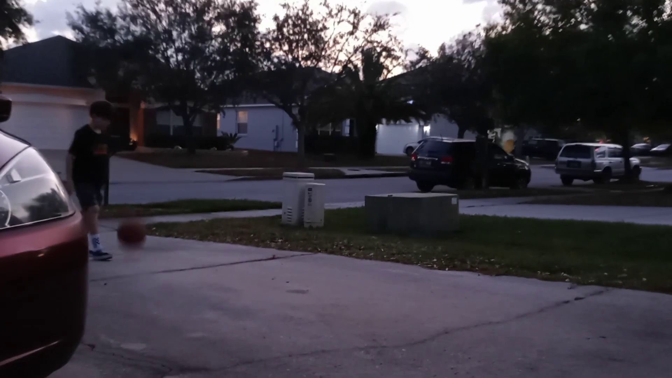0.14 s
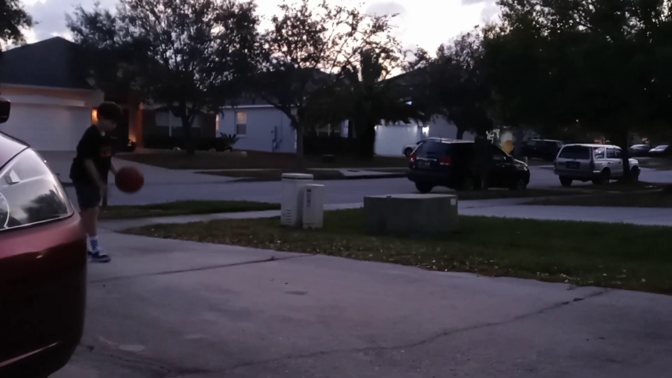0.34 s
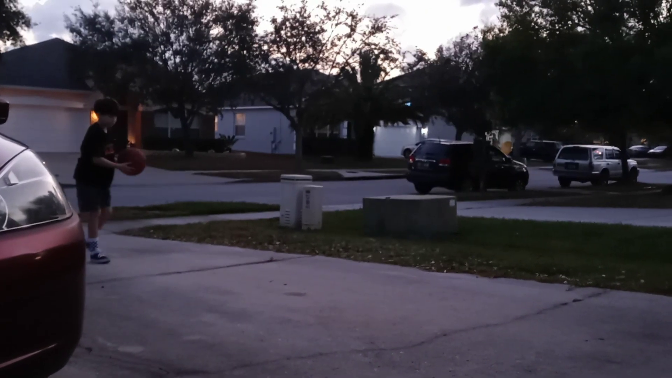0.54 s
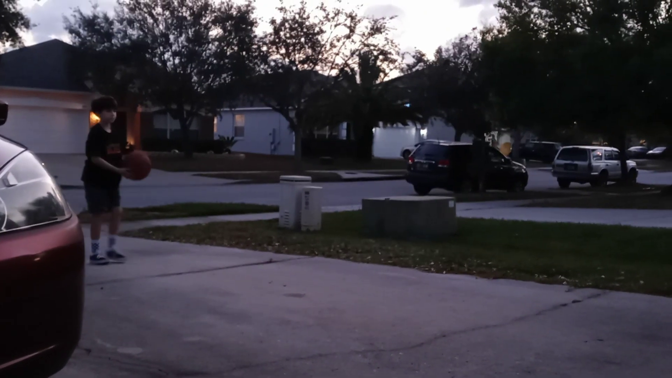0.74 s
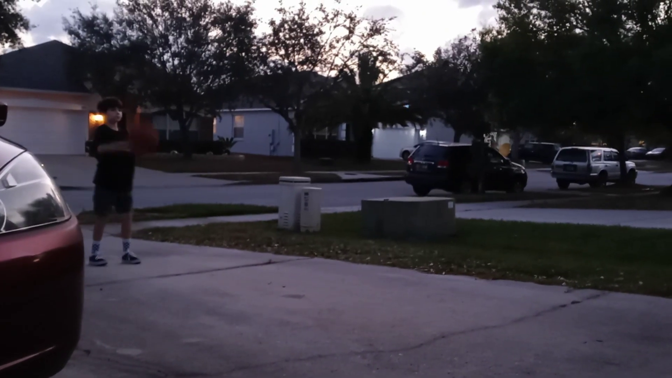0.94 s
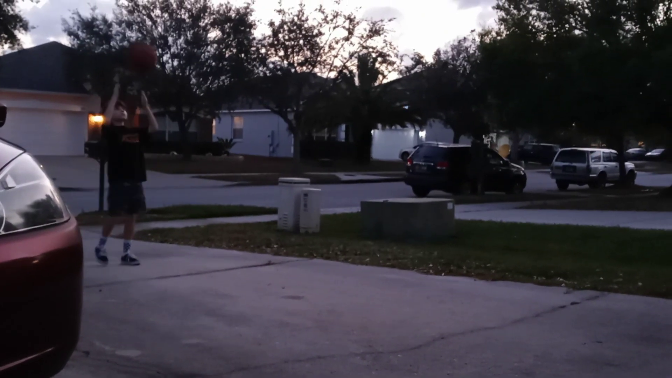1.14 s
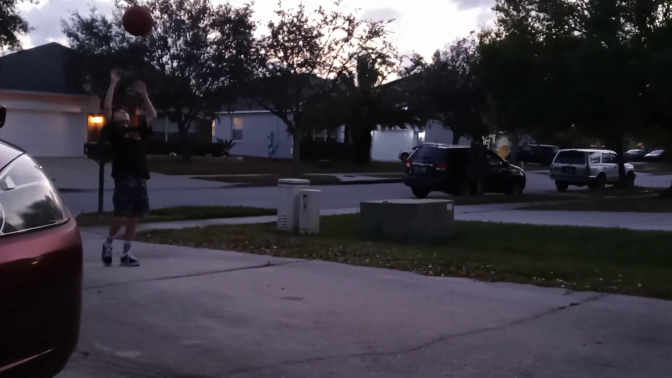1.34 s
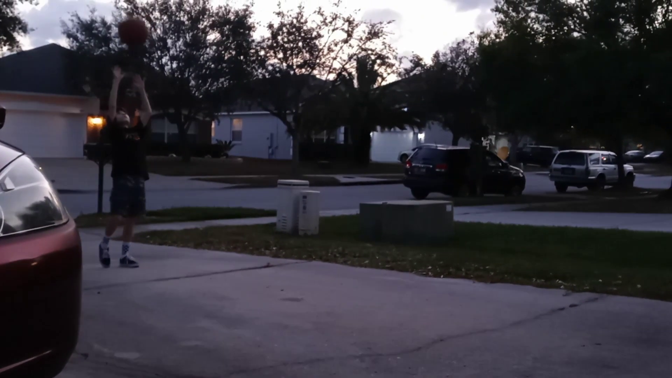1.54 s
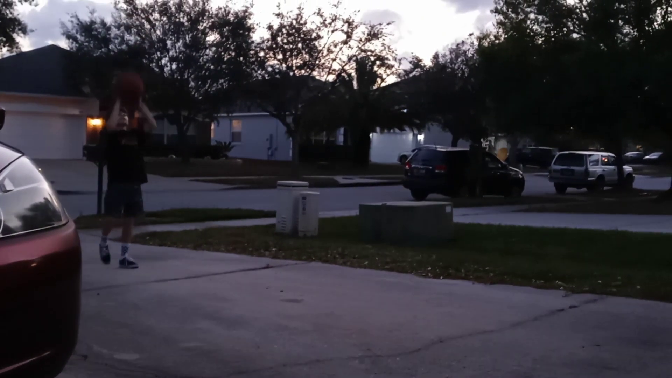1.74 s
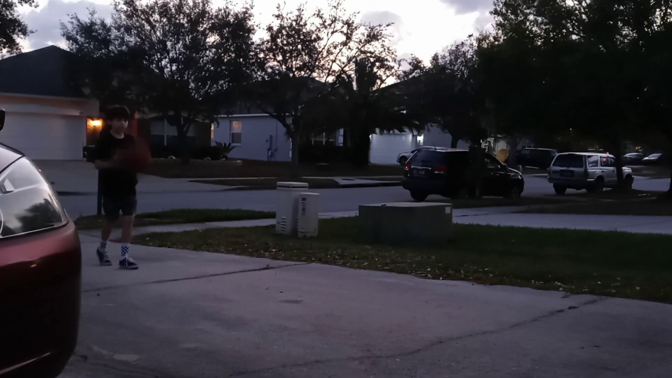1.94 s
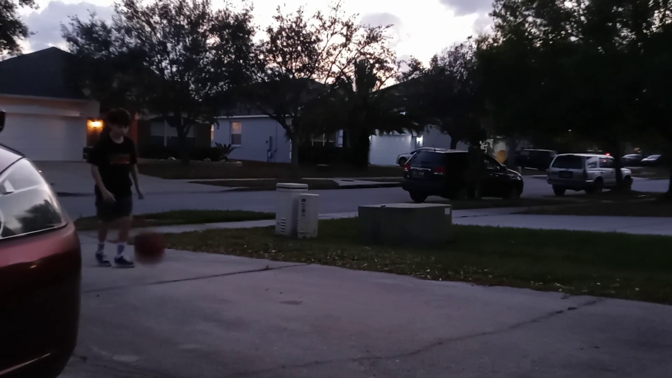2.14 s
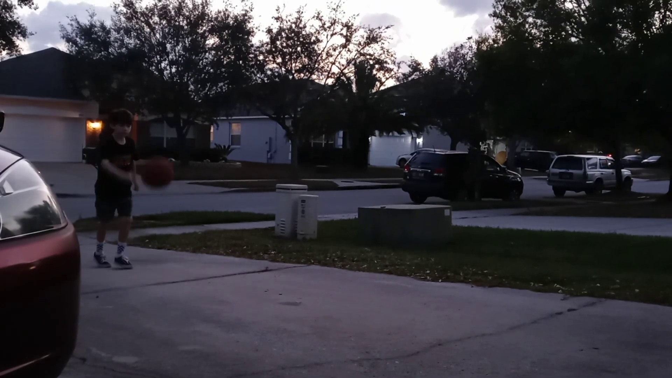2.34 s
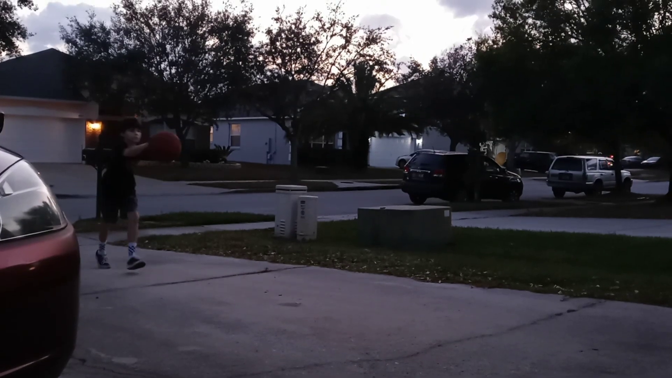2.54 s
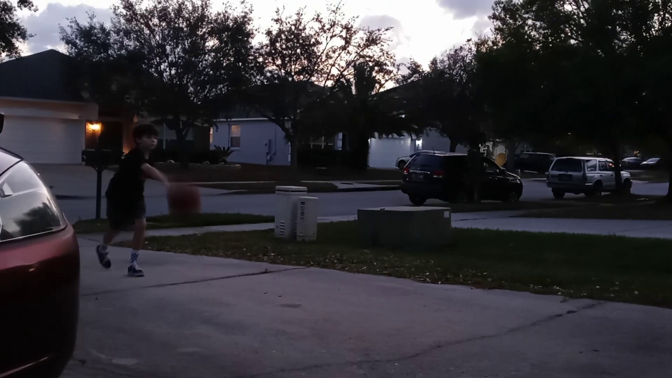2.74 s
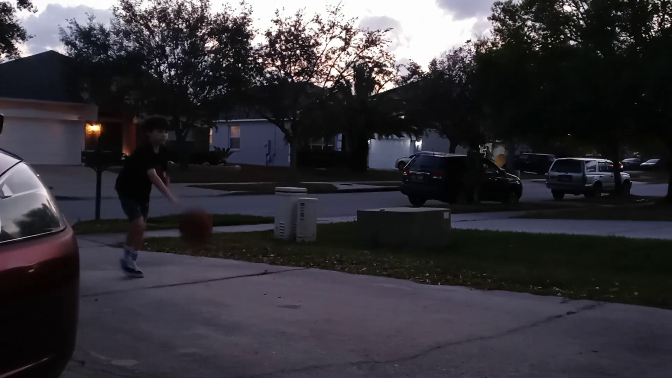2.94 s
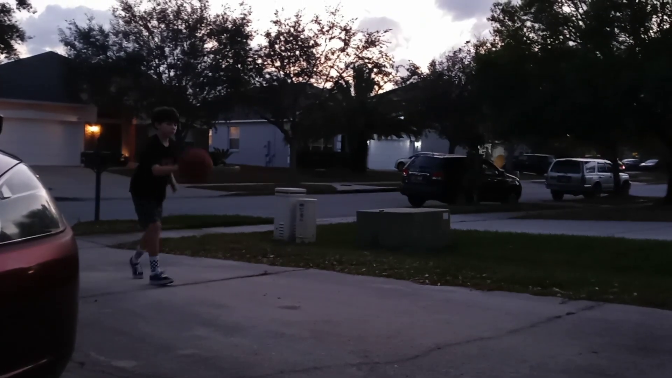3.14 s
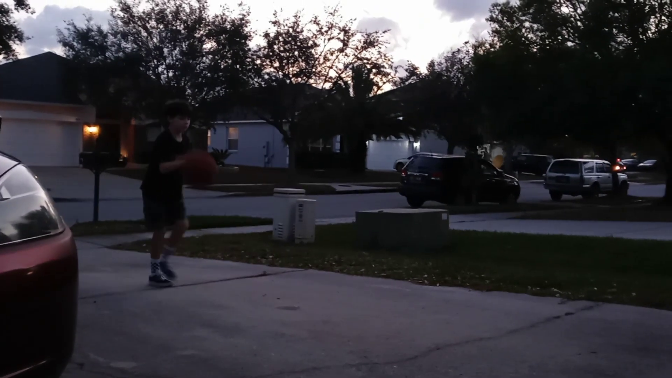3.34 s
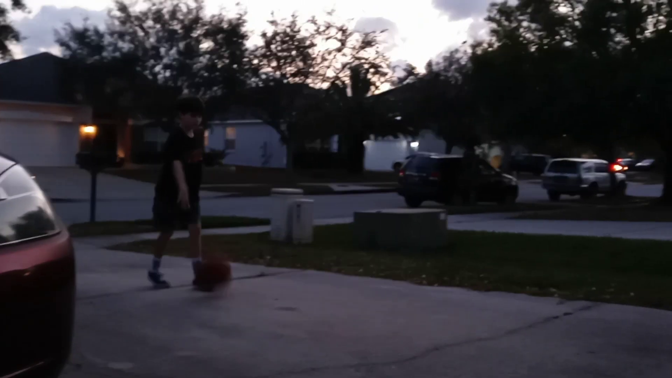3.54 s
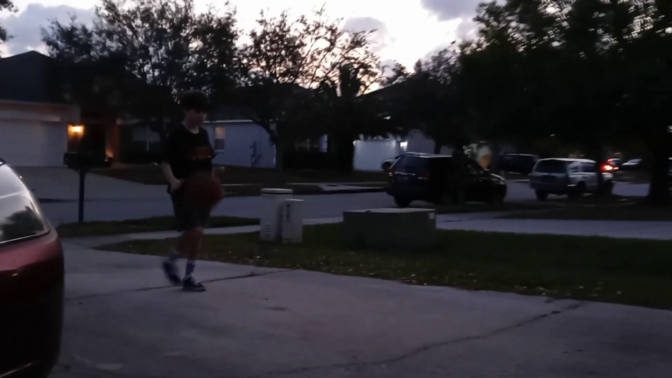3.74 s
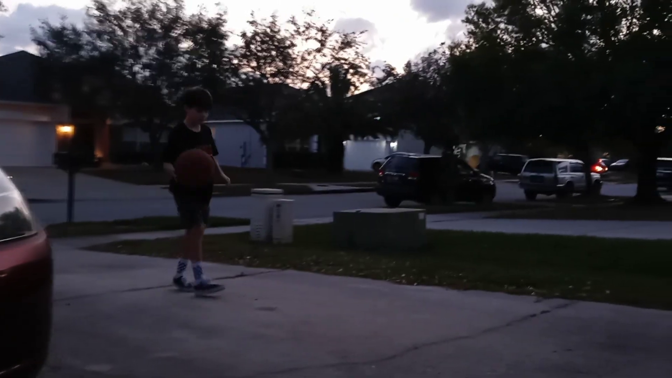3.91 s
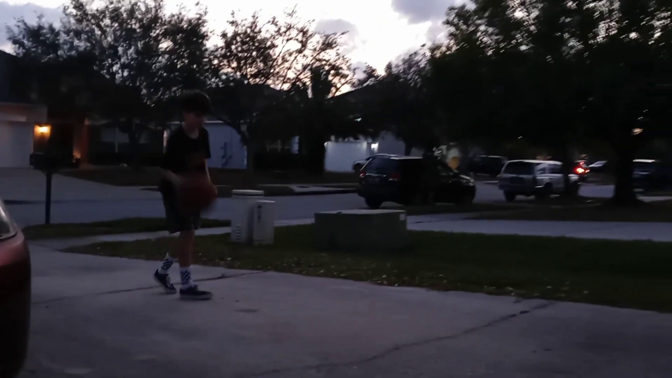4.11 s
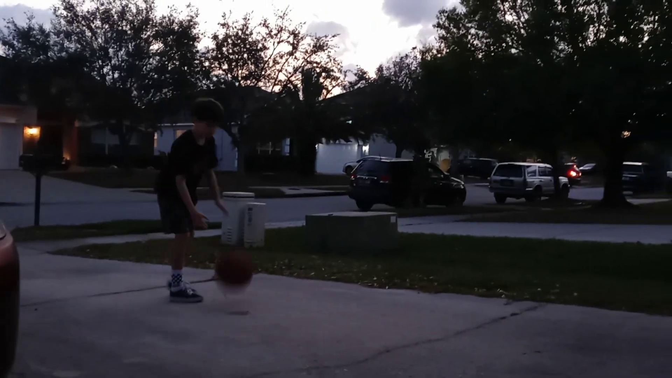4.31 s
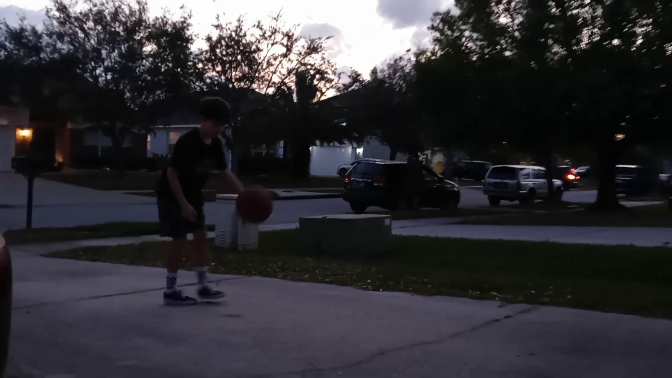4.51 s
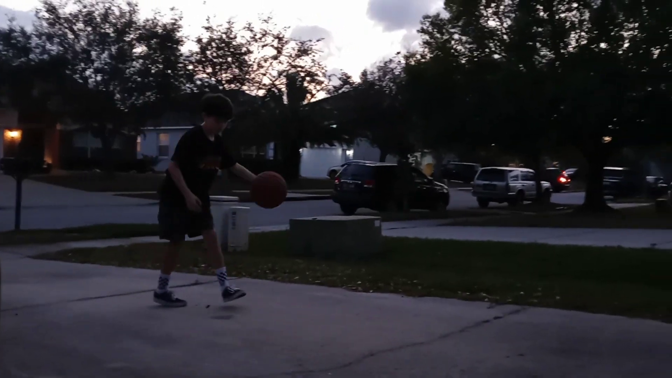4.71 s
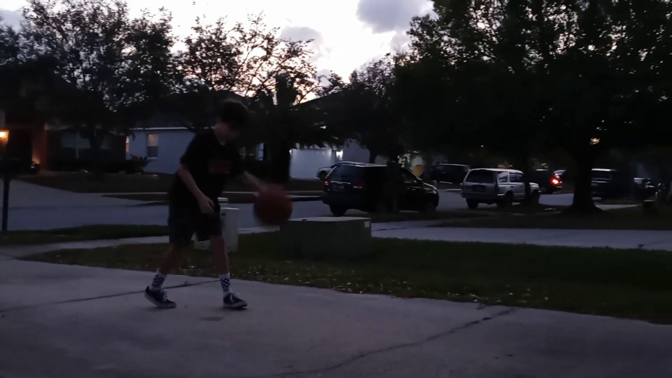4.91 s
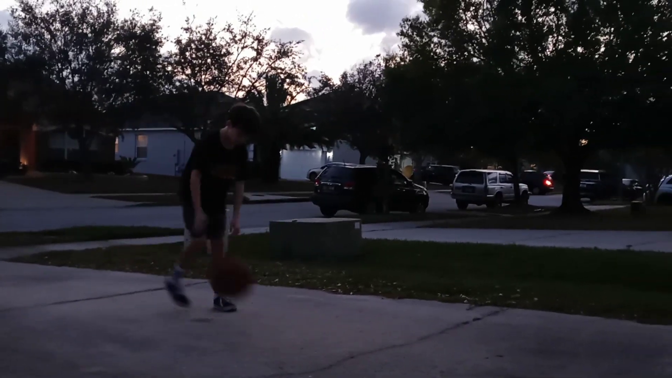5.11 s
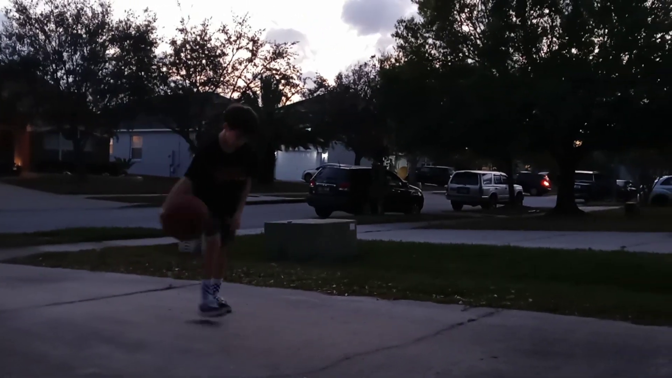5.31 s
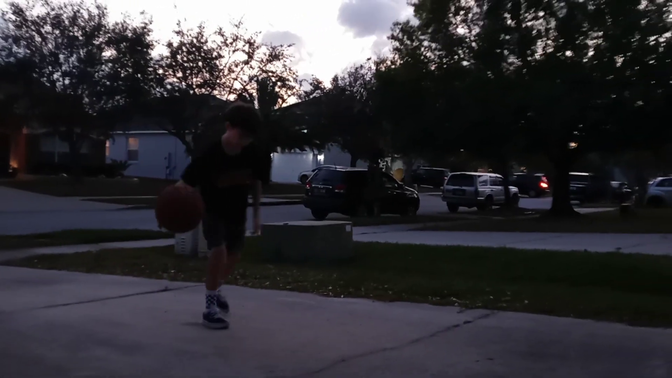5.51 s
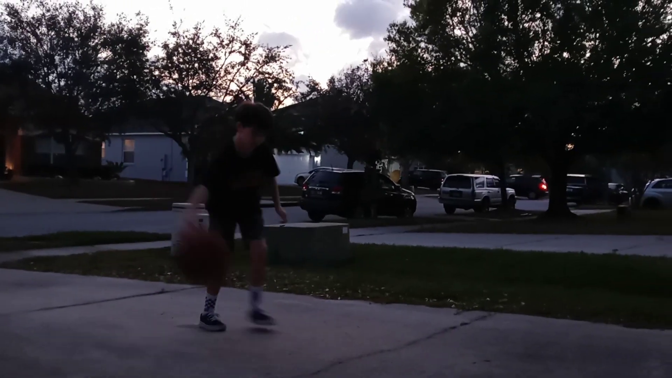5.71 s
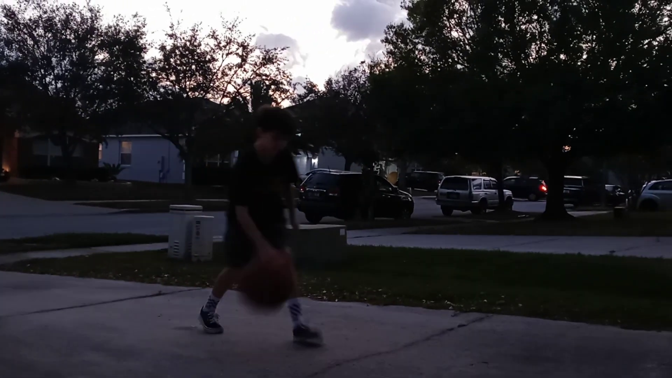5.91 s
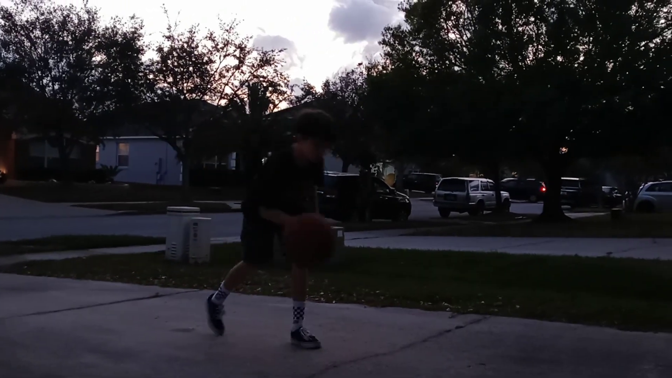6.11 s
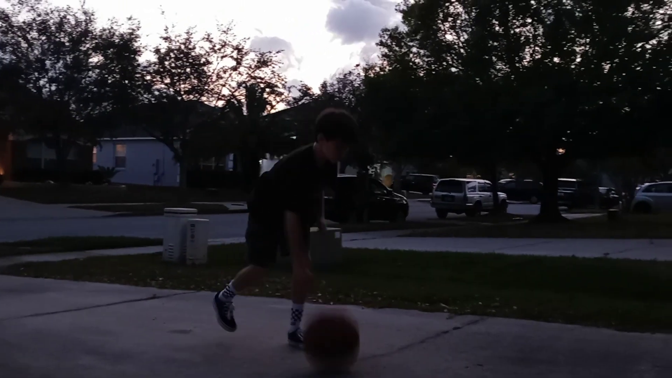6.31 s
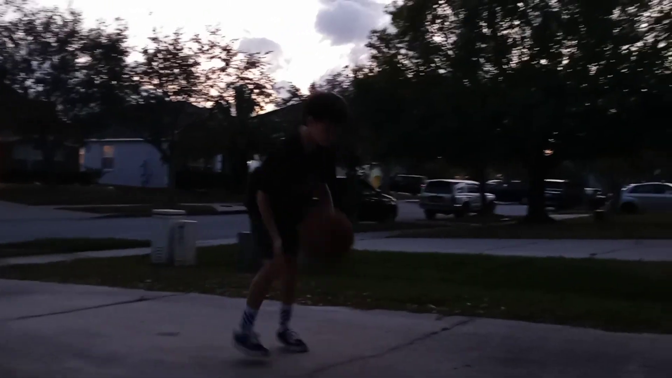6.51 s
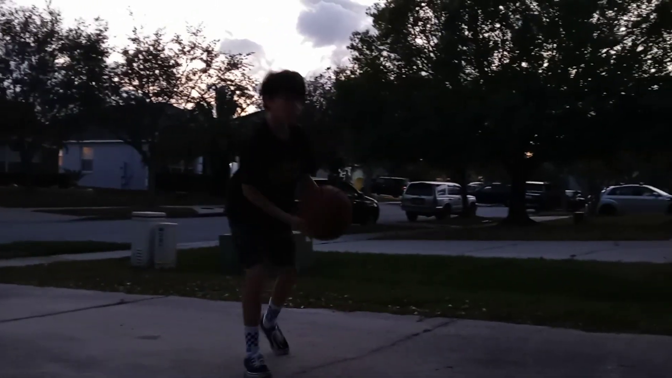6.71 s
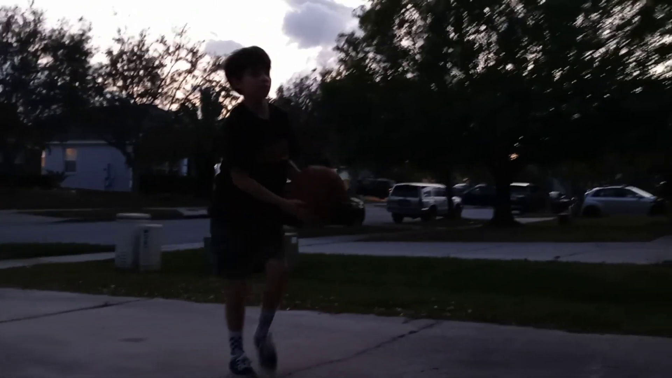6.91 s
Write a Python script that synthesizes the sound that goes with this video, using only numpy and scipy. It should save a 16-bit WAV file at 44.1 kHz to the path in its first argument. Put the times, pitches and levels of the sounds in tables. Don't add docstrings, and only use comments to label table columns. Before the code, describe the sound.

Sparse then steadier basketball dribbling on concrete, each hit a sharp slap and hollow ping with open-air echoes, over quiet street hum.

```python
import sys
import numpy as np
from scipy import signal
from scipy.fft import rfft, irfft
from scipy.io import wavfile
from scipy.ndimage import uniform_filter1d

SR = 44100
rng = np.random.default_rng(int(sys.argv[2]) if len(sys.argv) > 2 else 0)


def materialize(psi):
    bounded = np.clip(np.atleast_2d(psi).T, -1, 1)
    quanta = np.round(bounded * 32767).astype(np.int16)
    wavfile.write(sys.argv[1], SR, quanta)


def attenuation_scalar(level_db):
    decades = np.asarray(level_db, float) / 20
    return 10 ** decades


N = 306936

BAND_EDGES_HZ = [0, 400, 2300, 7600, 20000]
# freq_hz, density_db
TRAFFIC = [(18, -51), (30, -23), (43, -14.5), (107, 0), (141, -3.5), (213, -3.5), (309, -16.5),
           (333, -16.5), (395, -14), (503, -18), (584, -13.5), (802, -8.5), (1100, -12.5), (1980, -31),
           (2600, -46), (3380, -86), (5720, -120)]
# freq_hz, density_db
LEAVES = [(1350, -57), (2300, -10), (2580, -5), (3590, 3), (4480, 0), (5080, -7.5), (5890, 0), (6830, -2.5),
          (7730, -20.5), (8750, -16), (10100, -25.5), (11300, -13), (14800, -16.5), (16100, -21),
          (16500, -27)]
# time_s, level_db
TRAFFIC_SWELL = [(0.0, -47), (0.09, -44), (2.02, -47.5), (2.38, -41.5), (2.69, -47), (2.95, -44.5),
                 (3.14, -41.5), (3.47, -43), (3.89, -45), (5.04, -45), (5.31, -43.5), (6.96, -45.5)]
# time_s, level_db
BREEZE = [(0.0, -52), (0.13, -49), (0.6, -55), (2.05, -53.5), (2.34, -49), (2.48, -52), (3.61, -53.5),
          (4.3, -51.5), (4.98, -51), (5.35, -49.5), (5.66, -48), (6.43, -58.5), (6.59, -48), (6.96, -44.5)]
# usual_db, share_of_swell (ratio), nearing_db_per_s
LAYERS = [
    (-43.5, 0.71, -0.07),
    (-46.5, 0.18, 0.24),
    (-55.5, 0.83, .01),
    (-64.5, .8, 0.34),
]
# time_s, level_db
INSECT = [(0, -54.5), (.5, -59.5), (1.2, -59), (2.0, -59.5), (2.3, -78), (6.96, -83)]

# start_s, slap_db, thump_db, air_ring_db, squeak_hz
BOUNCES = [
    (-0.13, -26, -27, -4, 4000),
    (0.2016, -14, -25.5, -11.5, 4660),
    (2.203, -5, -27, -19, 3780),
    (2.9386, -9.5, -23.5, 0, 3820),
    (3.6165, -8, -23, -0.5, 4480),
    (4.3676, -12, -26, -1.5, 3770),
    (5.1529, -9, -21.5, 3.5, 3760),
    (5.91, -10, -21, 0, 3920),
    (6.3943, -5.5, -20, 2, 3400),
]
# turned_hz, turn_db, ping_db, swell_s, car_echo_ms
LANDINGS = [(1017, 3, -62, .05, 6), (1040, -5, -46, 0.095, 9.1), (1650, 0, -38, 0.03, 4.6),
            (1130, 17.5, -44, 0.037, 5.5), (1660, 2.5, -55, .05, 2.5), (2071, 17, -58, .05, 5.5),
            (1045, 16.5, -78, .05, 2.2), (1250, 12, -50, .05, 3), (1020, 14, -80, .05, 2.04)]
# freq_hz, density_db
SLAP = [(60, -6), (200, -9), (500, -4), (1200, 2.5), (1900, -2.5), (2400, -7), (3700, -4), (5000, -10),
        (6300, -9.5), (9000, -20), (12500, -17), (15000, -26), (17000, -63)]
# mode_hz, level_db, t60_s
THUMP = [(71.4, -72, 0.048), (115, -6, 0.33), (161.5, 7.5, 0.064), (183, 2, 0.16), (237.5, -3, 0.43),
         (357, -7, 0.25)]
# mode_hz, level_db, t60_s
BALL = [
    [(1055, -7.5, 0.12)],
    [(1128, -3, 0.17)],
    [(1211, 4, 0.093), (1300, 3, 0.056)],
    [(1450, -9, 0.068), (1677, -11.5, 0.099), (1790, -16, 0.32)],
    [(1906, -0.5, 0.036), (2154, -6, 0.46)],
]
GROUP_DB = [-25.5, -30, -30.5, -15.5, -32]
# centre_hz, level_db, t60_s
YARD = [(105, -3.5, 0.52), (244, -20, 0.81), (472, -19, 0.36), (984, -21.5, 0.33), (2250, -23.5, 0.28),
        (4200, -26, 0.27), (8750, -15.5, 0.37), (12400, -20, 0.31)]
# start_s, level_db, pitch_hz
FAR_SLAPS = [(.002, -39, 4000), (.026, -43, 4000), (.074, -43, 3950), (.35, -51, 3700), (.374, -43, 4000),
             (1.871, -51, 4200), (2.379, -38, 3940), (3.118, -40, 3970), (3.293, -43.5, 4100),
             (4.214, -42, 6000), (5.037, -43, 6400), (5.352, -40, 3670)]

# start_s, level_db, pat_db, t60_s
RUBS = [(0.028, -54.5, 22, 0.042), (0.0883, -68, 29, 0.051), (0.167, -29, -19, 0.038),
        (0.482, -41, -15, .03), (0.531, -35.5, -14, 0.047), (1.0993, -43, -20, 0.26),
        (1.296, -36, -15, 0.066), (2.0665, -37, -25, 0.13), (2.1203, -45.5, 0, 0.19),
        (4.039, -26.5, -17, 0.063), (4.0797, -42, 1, 0.077), (4.128, -44.5, -11, 0.23),
        (4.2294, -43, -4, 0.085), (4.279, -39, -5, 0.072), (5.063, -42.5, 6, 0.1),
        (5.4545, -17, -13, 0.029), (5.613, -42, 8, 0.064), (5.7995, -44, 4, 0.21), (6.147, -44.5, -2, 0.19),
        (6.18, -43, -5, 0.15), (6.246, -40, -4, 0.24), (6.3342, -39, 4.5, 0.1),
        (6.6742, -17.5, -4.5, 0.032), (6.7024, -16, -18, 0.08), (6.7191, -9, -6, 0.012)]
# start_s, level_db, pat_db, sand_db
TICKS = [(0.8584, -52, -8, 3), (0.905, -47, -8, -14), (0.959, -37.5, -8, -7), (1.7705, -43, -8, 0),
         (2.7615, -26.5, -17, -11.5), (2.767, -43, -9, 4), (3.185, -26, -10, -10.5), (3.496, -45, -6, 2),
         (4.009, -41, -2, -2), (4.111, -39, -6, -1), (4.197, -42, -8, -2), (4.633, -48, -8, -2),
         (4.698, -52, -8, 2), (4.750, -42.5, -8, 6), (4.854, -48, -8, 0), (4.875, -50, -5, 4),
         (4.953, -46, -8, -1), (4.983, -48, -8, 2), (5.4745, -32.5, 13, -15), (5.9755, -33, -8, 2),
         (6.002, -29, -8, -7), (6.576, -42, -8, 0), (6.9405, -43, 8, -7)]
# start_s, level_db
HEELS = [
    (4.008, -35),
    (4.053, -34),
    (4.109, -32),
    (4.134, -36),
    (5.477, -31),
]
# start_s, level_db
KNOCKS = [
    (5.4752, -7.5),
    (6.9407, -18),
]

PING_HZ, PING_T60_S, PING_WOBBLE_DB = 2872, 1.18, 1.6
TURN_WIDTH = .07
LATE_MODE_HZ, LATE_SWELL_S = 2100, 0.13
KNOCK_SPLIT_HZ = 2350
YARD_RISE_S = .0015
STREET_DB, STREET_RISE_S, STREET_T60_S = -34, 0.086, 0.83
CAR_ECHO_DB, HOUSE_FRONT_S, HOUSE_FRONT_DB = -11, .044, -12
TICK_T60_S, RUB_SAND_DB = .011, -8
PORT_NOTCH_HZ, PORT_NOTCH_DEPTH = 7880, 0.66


def unit(x):
    return x / np.sqrt(np.mean(x ** 2) + 1e-18)


def colour(x, points):
    hz, db = np.transpose(points)
    f = np.fft.rfftfreq(4096, 1 / SR)
    cepstrum = irfft(np.log(attenuation_scalar(np.interp(np.log(f + 1), np.log(hz), db))))
    cepstrum[1:2048] *= 2
    cepstrum[2049:] = 0
    response = irfft(np.exp(rfft(cepstrum)))[:2048]
    return signal.fftconvolve(x, response)[:len(x)]


def band(x, lo_hz, hi_hz, order=2):
    sos = signal.butter(order, [lo_hz, min(hi_hz, .47 * SR)], "band", fs=SR, output="sos")
    return signal.sosfilt(sos, x)


def fade(t, t60):
    return np.exp(-np.log(1000) * t / max(t60, .002))


def add(out, s, x):
    i = int(s * SR)
    x = x[max(-i, 0):len(out) - i]
    start = max(i, 0)
    out[start:start + len(x)] += x


def walk(rate):
    k = int(SR / rate)
    held = np.repeat(rng.standard_normal(N // k + 1), k)
    return uniform_filter1d(uniform_filter1d(held, k), k)[:N]


def swell(curve):
    db = np.interp(np.arange(N) / SR, *np.transpose(curve))
    return db - db.mean()


def ring(t, hz, db, t60, spread):
    first, second = hz * (1 + spread * rng.standard_normal(size=2))
    pair = np.sin(2 * np.pi * first * t) + 0.5 * np.sin(2 * np.pi * second * t)
    return -attenuation_scalar(db) * fade(t, t60) * pair


def neighbourhood():
    time = np.arange(N) / SR
    f = np.fft.rfftfreq(N, 1 / SR)
    cars, wind = (TRAFFIC, swell(TRAFFIC_SWELL)), (LEAVES, swell(BREEZE))
    sources = [cars, cars, wind, wind]
    out = np.zeros(N)
    for lo, hi, layer, source in zip(BAND_EDGES_HZ, BAND_EDGES_HZ[1:], LAYERS, sources):
        usual_db, share, nearing_db = layer
        points, push_db = source
        spectrum = rfft(colour(rng.standard_normal(N), points)) * (f >= lo) * (f < hi)
        level_db = usual_db + share * push_db + nearing_db * (time - time.mean())
        out += unit(irfft(spectrum, N)) * attenuation_scalar(level_db + 2 * walk(9))
    return out


def insect():
    level_db = np.interp(np.arange(N) / SR, *np.transpose(INSECT))
    return unit(band(rng.standard_normal(N), 4370, 4720)) * attenuation_scalar(level_db + 1.3 * walk(32))


def contact_slap(t, slap_db, ring_db, squeak_hz):
    crack = .15 * rng.standard_normal(len(t)) * fade(t, .004)
    crack[0] = -1
    out = attenuation_scalar(slap_db + 32) * band(colour(crack, SLAP), KNOCK_SPLIT_HZ, 15000, order=3)
    snap = colour(-1. * (t == 0), SLAP)
    out += attenuation_scalar(ring_db + 19.5) * band(snap, 930, KNOCK_SPLIT_HZ)
    out += ring(t, squeak_hz, slap_db - 2, .008, 0.013)
    sizzle = band(rng.standard_normal(len(t)), 10100, 13300)
    return out + attenuation_scalar(slap_db + 1.5) * sizzle * fade(t, .011)


def ball_thump(t, thump_db):
    modes = -sum(ring(t, hz, thump_db + db - 4.5, t60, 0.064) for hz, db, t60 in THUMP)
    push = attenuation_scalar(thump_db + 4) * np.sin(2 * np.pi * 118 * t) * fade(t, .04)
    return modes + push


def air_ring(t, ring_db, turned_hz, turn_db, ping_db):
    air = np.zeros(len(t))
    for group, group_db in zip(BALL, GROUP_DB):
        distance = np.log(np.mean(group, axis=0)[0] / turned_hz) / TURN_WIDTH
        facing_db = turn_db * np.exp(-distance ** 2)
        for hz, db, t60 in group:
            mode = ring(t, hz, ring_db + group_db + facing_db + db - 4, t60, 0.01)
            if hz > LATE_MODE_HZ:
                mode = mode * (1 - np.exp(-(t / LATE_SWELL_S) ** 2))
            air += mode
    air += ring(t, 800, -26.5, 0.09, 0.051)
    air += ring(t, 499, -39 + 0.33 * (ping_db + 48.5), 0.47, 0.0051)
    smear = rng.standard_normal(len(t)) * fade(t, 0.33)
    return air + attenuation_scalar(-36.5) * signal.fftconvolve(air, smear)[:len(t)]


def thin_ping(t, ping_db, swell_s):
    sine = np.sin(2 * np.pi * PING_HZ * t) * fade(t, PING_T60_S)
    rise = 1 - np.exp(-(t / swell_s) ** 2)
    return attenuation_scalar(ping_db) * sine * rise * attenuation_scalar(PING_WOBBLE_DB * walk(28)[:len(t)])


def yard(t):
    def lumps():
        return np.repeat(rng.standard_normal(len(t) // 88 + 1), 88)[:len(t)]

    shared = 1.7 * lumps()
    tail = np.zeros(len(t))
    for hz, db, t60 in YARD:
        level_db = db + shared + 1.9 * uniform_filter1d(lumps(), size=60)
        noise = band(rng.standard_normal(len(t)), hz / 1.543, hz * 1.18)
        tail += attenuation_scalar(level_db) * fade(t, t60) * noise
    return tail * (1 - np.exp(-t / YARD_RISE_S))


def reflections(t, slap, thump, slap_db, squeak_hz, echo_ms):
    street = attenuation_scalar(STREET_DB) * rng.standard_normal(len(t)) * fade(t, STREET_T60_S)
    street *= 1 - np.exp(-(t / STREET_RISE_S) ** 2)
    wet = attenuation_scalar(7.5 + 0.39 * (slap_db + 10)) * colour(yard(t) + street, SLAP)
    wet = wet + attenuation_scalar(slap_db + 9.5) * band(wet, squeak_hz / 1.13, squeak_hz * 0.95, order=1)
    add(wet, echo_ms / 1000, attenuation_scalar(CAR_ECHO_DB) * slap)
    add(wet, HOUSE_FRONT_S, attenuation_scalar(HOUSE_FRONT_DB) * (thump + 0.21 * slap))
    return wet


def bounces():
    out, t = np.zeros(N), np.arange(int(.8 * SR)) / SR
    for blow, landing in zip(BOUNCES, LANDINGS):
        s, slap_db, thump_db, ring_db, squeak_hz = blow
        turned_hz, turn_db, ping_db, swell_s, echo_ms = landing
        slap = contact_slap(t, slap_db, ring_db, squeak_hz)
        thump = ball_thump(t, thump_db)
        air = air_ring(t, ring_db, turned_hz, turn_db, ping_db)
        wet = reflections(t, slap, thump, slap_db, squeak_hz, echo_ms)
        add(out, s, slap + thump + air + wet + thin_ping(t, ping_db, swell_s))
    return out


def far_slaps():
    out, t = np.zeros(N), np.arange(int(.8 * SR)) / SR
    for s, db, hz in FAR_SLAPS:
        add(out, s, ring(t, hz, db + 3, .022, 0.04))
    return out


def scuffs(events, attack_s, grit_db, sand_hz, snap):
    out, t = np.zeros(N), np.arange(int(.25 * SR)) / SR
    for s, db, pat_db, sand_db, t60 in events:
        grains = attenuation_scalar(grit_db * rng.exponential(size=len(t)))
        shape = (fade(t, t60) + .08 * fade(t, .3)) * (1 - np.exp(-t / attack_s))
        grit = unit(rng.standard_normal(len(t)) * grains) * shape
        grit[0] = -snap
        pat = attenuation_scalar(pat_db - 6.5) * unit(band(grit, 210, 1840))
        rub = attenuation_scalar(-4) * unit(band(grit, 2773, 6940, order=3))
        sand = attenuation_scalar(sand_db) * unit(band(grit, sand_hz, 14500))
        add(out, s, attenuation_scalar(db) * (pat + rub + sand) * np.sqrt(np.mean(shape ** 2)))
    return out


def rubs():
    events = [(s, db, pat_db, RUB_SAND_DB, t60) for s, db, pat_db, t60 in RUBS]
    return scuffs(events, attack_s=0.0031, grit_db=0, sand_hz=8500, snap=.1)


def ticks():
    events = [(*row, TICK_T60_S) for row in TICKS]
    return scuffs(events, attack_s=.0003, grit_db=4, sand_hz=9500, snap=3.2)


def heels():
    out, t = np.zeros(N), np.arange(int(.1 * SR)) / SR
    for s, db in HEELS:
        add(out, s, ring(t, 333, db, 0.031, 0.22) + ring(t, 136, db - 7, 0.065, .1))
    return out


def catches():
    out, t = np.zeros(N), np.arange(int(.8 * SR)) / SR
    for s, db in KNOCKS:
        knock = rng.standard_normal(len(t)) * (fade(t, 0.004) + 0.25 * fade(t, 0.14))
        knock[:4] = -1.5
        add(out, s, attenuation_scalar(db - 3.5) * band(knock, 200, 1800, order=1))
    return out


def scene():
    near = bounces() + far_slaps() + rubs() + ticks() + heels() + catches()
    notch = band(near, PORT_NOTCH_HZ / 1.124, PORT_NOTCH_HZ * 1.047, order=1)
    return (near - PORT_NOTCH_DEPTH * notch + neighbourhood() + insect())[None]


def roll_off(x):
    return signal.sosfilt(signal.butter(12, 16780, fs=SR, output="sos"), x)


def record(dry):
    x = signal.sosfilt(signal.butter(5, 52, "high", fs=SR, output="sos"), dry)
    x = signal.sosfilt(signal.ellip(6, .3, 25, 15600, fs=SR, output="sos"), x)
    x = np.tanh(0.98 * x)
    x = signal.sosfilt(signal.ellip(6, .3, 40, 16700, fs=SR, output="sos"), x)
    return roll_off(x)


dry = scene()
out = record(dry)
materialize(out)
```